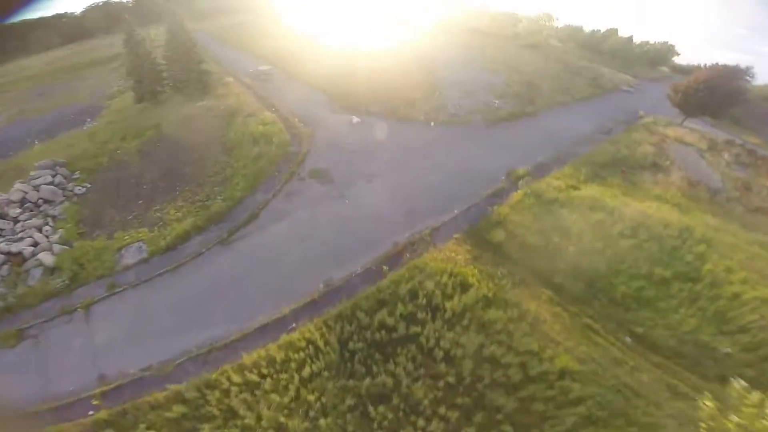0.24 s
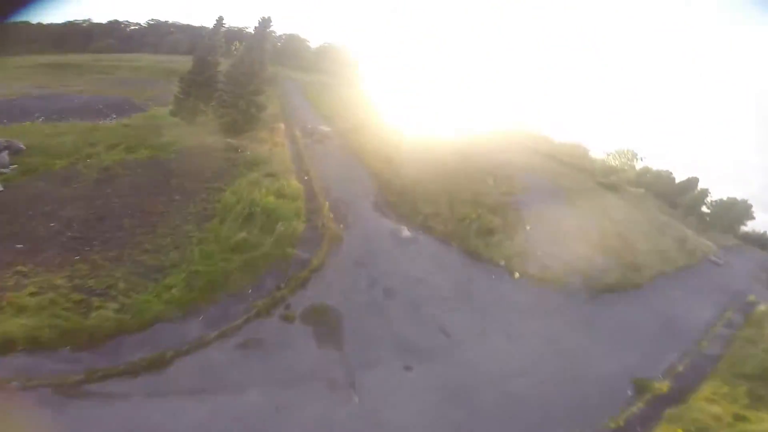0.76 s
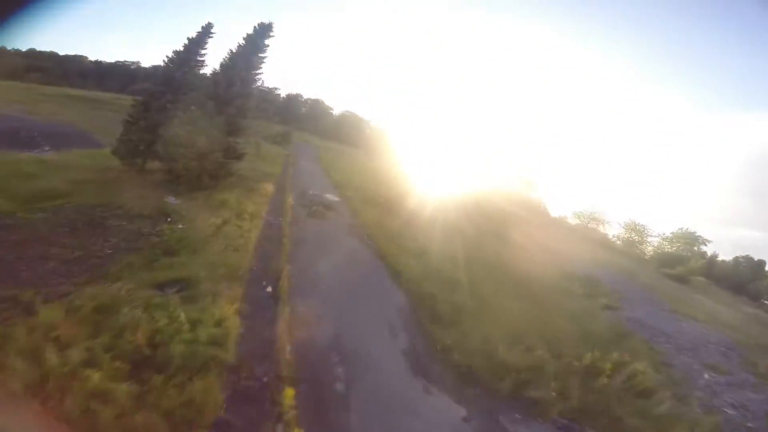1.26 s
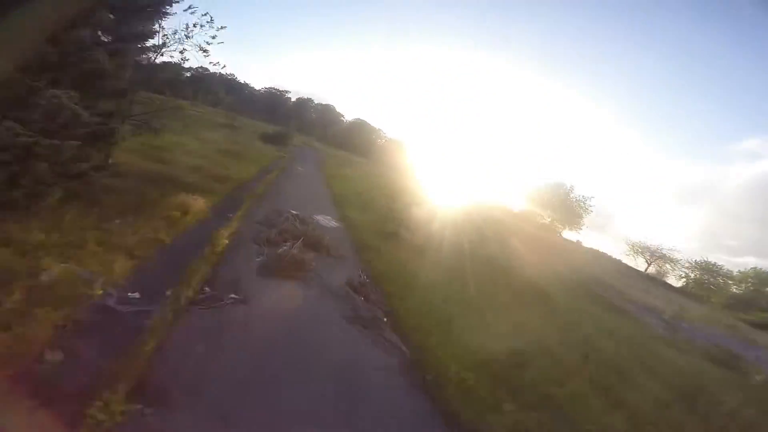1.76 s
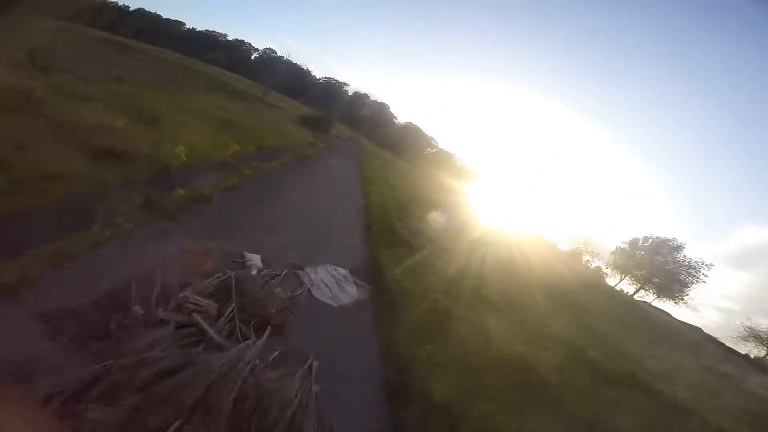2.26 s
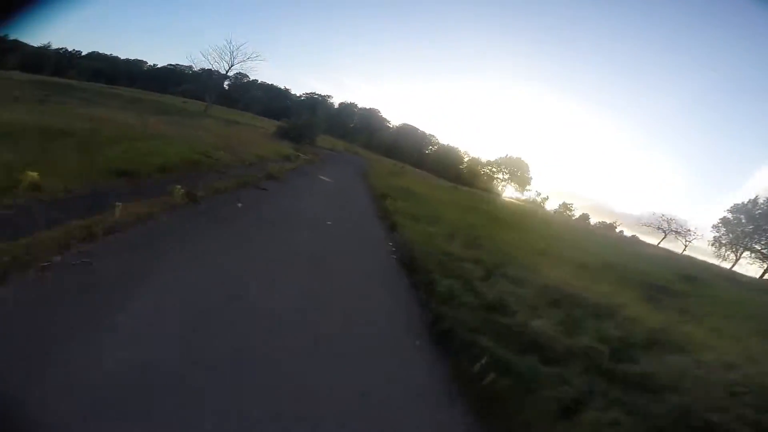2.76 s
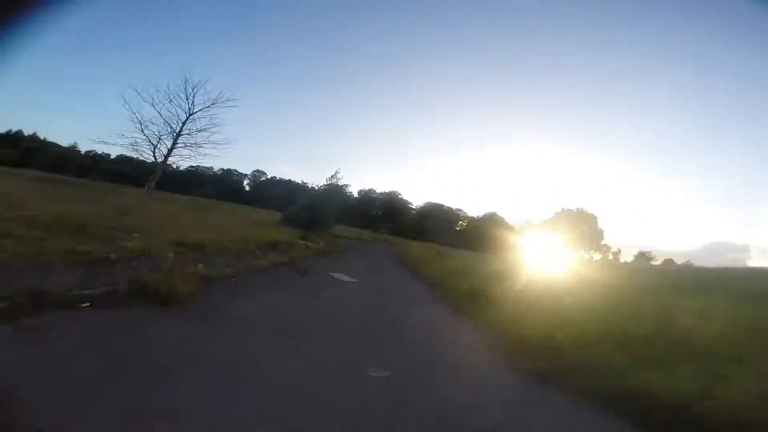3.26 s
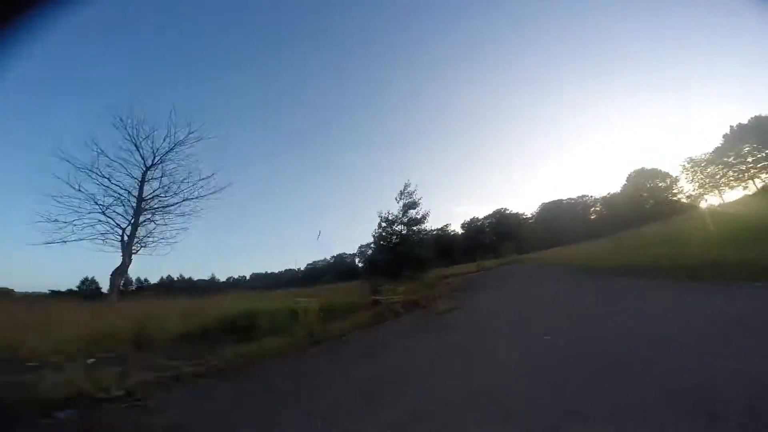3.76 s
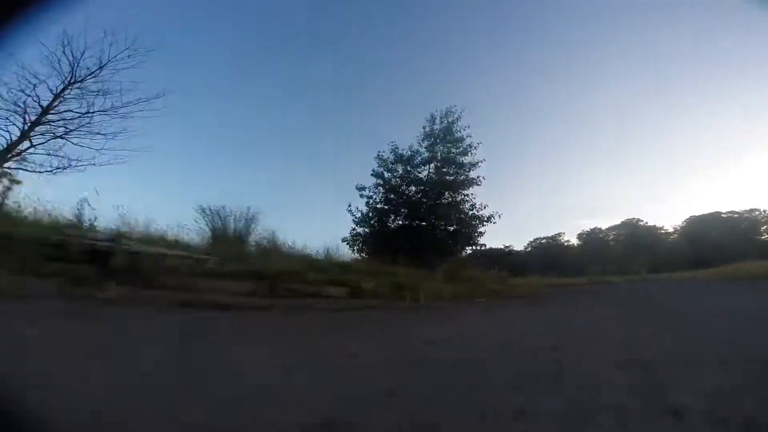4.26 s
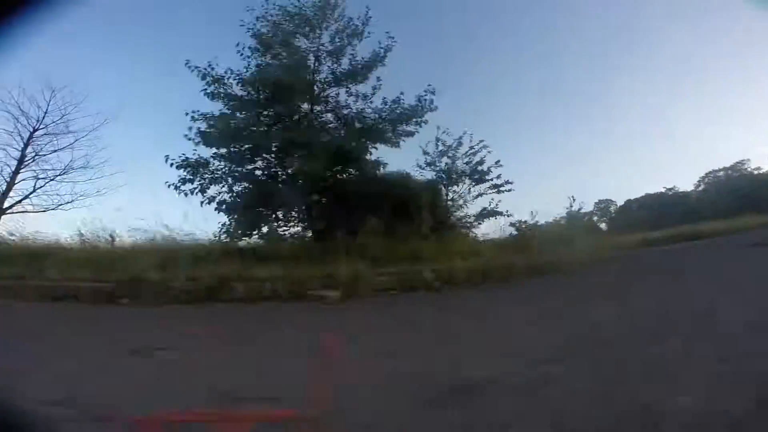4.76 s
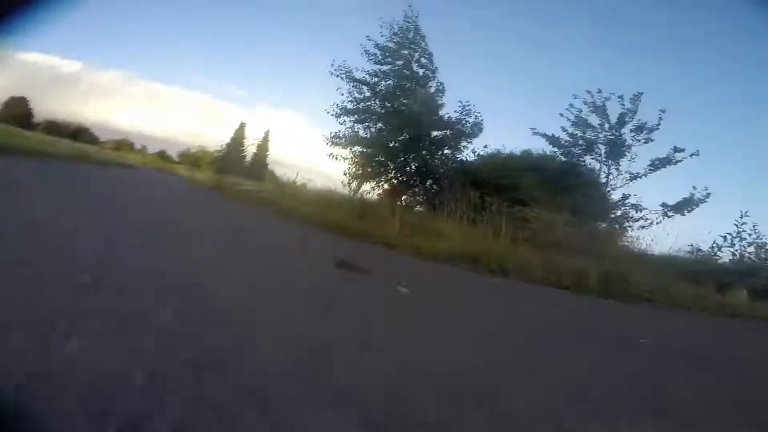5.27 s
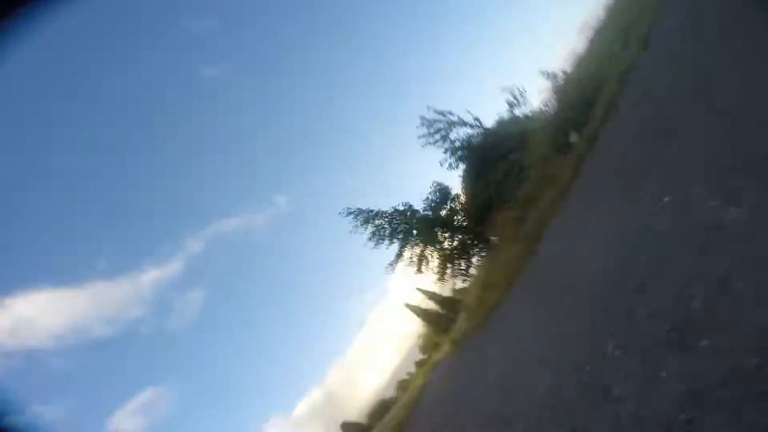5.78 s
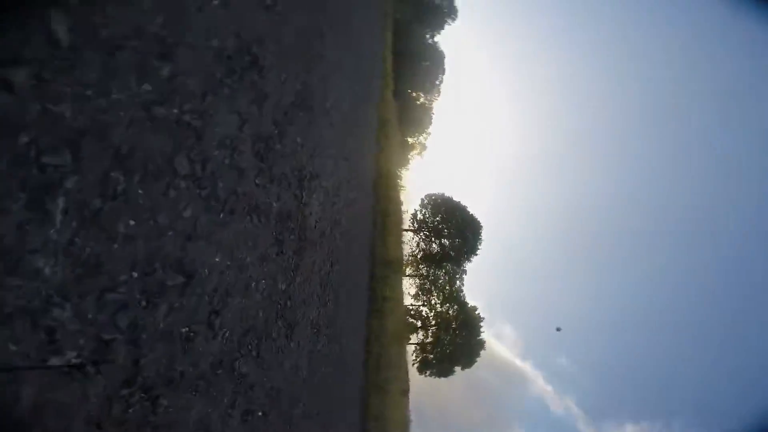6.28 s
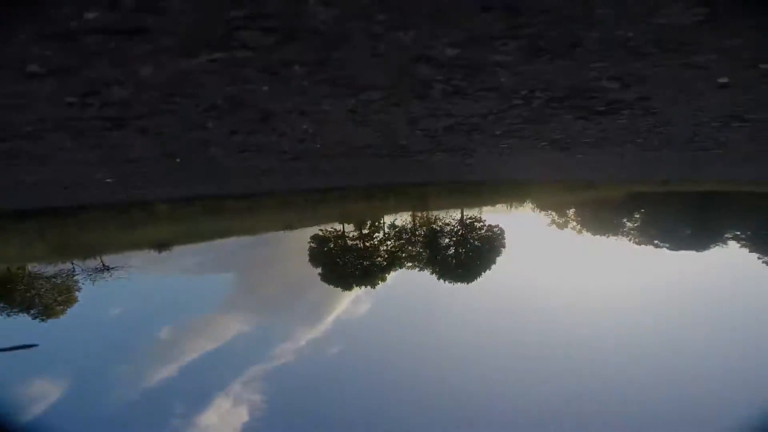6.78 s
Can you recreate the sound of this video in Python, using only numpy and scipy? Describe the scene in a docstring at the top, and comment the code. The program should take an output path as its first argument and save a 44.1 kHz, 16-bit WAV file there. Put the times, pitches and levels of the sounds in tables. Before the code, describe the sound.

Onboard a small quadcopter: wavering propeller drone, a sharp knock, rough sagging buzz, motor cut, then clattering thumps and scrapes before near silence outdoors.

```python
"""A racing quadcopter, heard from its own camera, swoops low over a path: four propeller tones beat in rushing air.
One propeller chips on the ground and from then on its imbalance shakes the frame once a turn.
The craft grazes the path again, its blows exciting damped frame modes; then the throttle is cut.
It tumbles over gritty asphalt, with thumps, noise bursts and stick-slip squeaks that overload the microphone,
and rocks to rest, leaving quiet outdoor air."""
import sys
import numpy as np
from scipy import signal
from scipy.fft import rfft, irfft, next_fast_len
from scipy.io import wavfile

SR = 44100
rng = np.random.default_rng(int(sys.argv[2]) if len(sys.argv) > 2 else 0)


def bounce(signal):
    """Save signal as a 16-bit WAV file at the path given by the first command-line argument."""
    frames = np.transpose(np.atleast_2d(signal))
    limited = np.clip(frames, -1, 1)
    pcm = np.round(limited * 32767).astype(np.int16)
    wavfile.write(sys.argv[1], SR, pcm)


N = 310047

# Levels in the tables are relative; the functions add the common offsets.
# Noise spectra, later scaled to rms 1: (frequency [Hz], density [dB per Hz])
STILL_AIR_SPECTRUM = [(25, 3.5), (150, -4), (700, -10.5), (1300, -27), (3000, -36.5), (8000, -34.5),
                      (15000, -41.5)]
WIND_SPECTRUM = [(20, -4.5), (45, 0.5), (85, 1.5), (160, 0), (260, -6), (500, -1.5), (1200, -53.5)]
BLADE_HISS_SPECTRUM = [(200, -2.5), (400, 2), (800, 10.5), (1100, -6), (1600, -4), (2300, -12.5),
                       (3800, -16), (4900, -13.5), (6800, -18), (8200, -24), (11000, -23), (13500, -37.5),
                       (14800, -29), (15600, -52.5)]
CHIPPED_HISS_SPECTRUM = [(150, -3.5), (300, 20), (600, 7.5), (1100, 2), (1700, -6.5), (2700, -10.5),
                         (3600, -12.5), (4500, -16.5), (6500, -18), (8500, -22), (11000, -20.5),
                         (13000, -31.5), (15000, -37), (15800, -56)]
GRIT_SPECTRUM = [(100, 9), (350, 9.5), (750, 13), (1000, -4), (1400, -2), (2200, -12.5), (3000, -4),
                 (4200, -17), (5800, -11), (7100, -16.5), (8500, -17), (11500, -18), (16000, -38.5)]
SLIDE_SPECTRUM = [(40, 10.5), (130, 12.5), (300, 12), (650, 1), (1100, -28), (2000, -33.5), (4000, -34),
                  (7000, -41), (11000, -45), (15000, -49)]
ROCKING_SPECTRUM = [(100, -35), (350, 4.5), (520, 11), (700, 0.5), (1000, -13.5), (2500, -38), (8000, -59),
                    (15000, -52)]

# Air in clean flight: (time [s], blade hiss [dB], buffeting [dB])
CLEAN_AIR = [(0, -40, -25), (.35, -38, -31), (1.15, -36.5, -31), (1.55, -34.5, -23), (1.85, -38, -25),
             (2.3, -36, -15), (2.66, -32.5, -15), (2.9, -38, -24.5), (3.2, -35, -22)]

# Stone squeaking along the frame: (time [s], level [dB])
SQUEAKS = [(4.3983, -34), (6.5043, -15.5), (6.5339, -25.5)]
SQUEAK_HZ, SQUEAK_WAVER = 6650, 0.11  # mean pitch, relative spread
SQUEAK_ATTACK_S, SQUEAK_RELEASE_S = 0.0014, 0.001

# Slides on the asphalt: (start time [s], length [s], level [dB])
SLIDES = [(4.401, .065, -24.5), (5.586, 0.011, -28), (5.676, 0.13, -35.5), (5.949, 0.011, -22),
          (6.035, 0.064, -21.5), (6.347, .06, -32), (6.384, 0.166, -28), (6.602, 0.034, -23),
          (6.774, 0.051, -31)]
SLIDE_ATTACK_S, SLIDE_RELEASE_S = 0.013, 0.038
# The frame rocks as it settles, building up to its last contact and dying away
ROCK_S, ROCK_DB, ROCK_RISE_S, ROCK_FALL_S = 6.955, -24, 0.11, 0.058

# Modes of frame and camera case: (frequency [Hz], level [dB], undamped-by-contact decay t60 [s])
FRAME_MODES = [(253, 3, 0.021), (332.5, 1, 0.022), (417.4, -2.5, 0.031), (556, 4, 0.029), (677, 3.5, 0.027),
               (774, 4.5, 0.036), (1350, -15.5, 0.017), (2050, -25, 0.0081), (2870, -23.5, 0.0084)]
# Bumps of the camera in its soft mount, without ground contact: (time [s], thump level [dB])
MOUNT_BUMPS = [(4.678, -16), (5.757, -8), (5.819, -1.5), (5.841, -8.5), (5.942, -3), (6.088, -13),
               (6.192, -7), (6.207, -11)]
BUMP_RING_DB, BUMP_HZ = -12.5, 220  # frame ring relative to the thump, frequency favoured
# Blows on the ground: (time [s], frame ring [dB], frequency favoured by the point of contact [Hz],
# thump [dB], grit [dB], grit decay t60 [s])
GROUND_BLOWS = [(3.208, 2.5, 326, -18, -19, 0.03), (4.398, -5, 500, -25, -14, 0.036),
                (4.410, -1.5, 238, -25, -26, 0.019), (4.431, -5, 251, -30, -42, .02),
                (4.958, -22, 496.3, -9.5, -10.5, 0.042), (4.970, 1, 325.7, -16, -27, .012),
                (5.6824, -1, 260.4, -0.5, -1, 0.014), (5.691, -14, 300, -16, -15, 0.011),
                (5.7353, -5.5, 450, -0.5, -10, 0.031), (5.8316, -14, 394, -8, -5, 0.005),
                (5.9323, -5, 603, -37, -9.5, 0.0095), (6.013, -11, 565, -31, -25, .028),
                (6.036, -12.5, 680, -18, -32, 0.045), (6.073, -13, 300, -15, -20, 0.031),
                (6.108, -13, 328, -25, -18, 0.038), (6.1724, -12, 645, -1.5, 3, 0.017),
                (6.178, 15.5, 201, 0.5, 5, 0.0062), (6.398, -6.5, 546, -14, -6.5, .022),
                (6.406, -6.5, 316, -8, -25, 0.048), (6.473, -23, 755, -36, -36, .024),
                (6.496, -16, 736, -28, -7, 0.026), (6.506, -6, 322, -14, -23, 0.021),
                (6.535, -15.5, 634, -12, -22.5, 0.014), (6.588, -20, 426, -22, -26, .03),
                (6.628, -20, 333, -21, -17.5, 0.021), (6.683, -21, 700, -26, 1.5, .016),
                (6.687, 7.5, 292.8, -8.5, 7, 0.0053), (6.842, 15, 392.4, -13, -7.5, 0.0088),
                (6.905, -1.5, 472, -36, -31, 0.028), (6.946, -11.5, 550, -46, -37, 0.04)]

# Frame resonances that lift any motor tone passing through: (frequency [Hz], width [Hz], lift [dB])
FRAME_LIFTS = [(1428, 140, 7), (1885, 52, 5.5), (2623, 78, 9), (2960, 180, 7)]
# Tone of a two-blade propeller: (multiple of the shaft rate, level [dB])
PROP_ORDERS = [(2, 1), (3, -28), (4, -24.5), (5, -31), (6, -31), (7, -34), (8, -35)]
# Swooping, easing off, pulling up: (time [s], blade-pass rate of each of the four propellers [Hz])
BLADE_PASS_RATES = [(0, 580.2, 702.4, 603, 435.2), (.13, 619.5, 687.2, 589.8, 462),
                    (0.279, 665, 667, 584, 518), (0.478, 716.7, 680.6, 608, 535),
                    (.8, 725.4, 695, 592, 542), (1.05, 740.6, 684, 593, 524), (1.35, 744, 672.3, 580, 504),
                    (1.561, 727, 648.4, 562, 460), (1.74, 696, 607.8, 542, 439.3),
                    (1.86, 642, 583.4, 522, 420), (2.04, 638, 546.6, 476, 397),
                    (2.319, 628, 536.4, 472, 381), (2.56, 627, 499.6, 470, 362.3),
                    (2.81, 629, 510.2, 476, 360), (2.99, 733.4, 608.6, 568, 417),
                    (3.21, 742, 635, 578, 442)]
# The four propellers: (tone at full thrust [dB], blade-pass rate below which it unloads [Hz])
PROP_LOADS = [(-19.5, 580), (-20.5, 370), (-20.5, 477), (-20, 519)]
THRUST_ORDER = 15  # how steeply the tone of an unloading propeller falls
INFLOW_DB, INFLOW_PER_S = 1.28, 4.7  # gusty inflow: spread and rate of each tone's swelling
# Hum of the shafts: (time [s], level relative to the blade tone, before the speed law [dB])
SHAFT_HUM = [(0, -9), (1.0, -12.5), (1.5, -6), (1.85, -7.5), (2.1, -13), (2.85, -12.5), (3.0, -4.5)]

CHIP_S, CUT_S = 3.213, 5.602  # the propeller chips; the throttle is cut
CRUISE_HZ = 300  # shaft rate at which the levels of the chipped propeller hold
# Chipped propeller at cruise: (time [s], shake [dB], blade tone [dB], hiss [dB], buffeting [dB])
CHIPPED_LEVELS = [(3.22, -14, -38, -44, -37), (3.68, -13, -32, -44.5, -43), (3.86, -11.5, -19.5, -39, -36),
                  (4.05, -10.5, -28, -43, -30.5), (4.35, -10.5, -26, -41.5, -42),
                  (4.58, -11, -21.5, -41.5, -63), (4.9, -11, -21, -36.5, -40), (5.05, -13.5, -26, -45, -40),
                  (5.3, -12.5, -19.5, -39, -21.5), (5.45, -12, -24, -36, -27),
                  (5.59, -7.5, -16, -32.5, -21)]
# Odd multiples, from the imbalance: (multiple of the shaft rate, level [dB])
SHAKE_ORDERS = [(3, -19.5), (5, -39), (7, -41.5), (9, -44), (11, -55), (13, -49)]
# Even multiples, from the blades: (multiple of the shaft rate, level [dB])
BLADE_ORDERS = [(2, 1), (4, -13), (6, -27.5), (8, -39), (10, -44.5), (12, -36.5)]
# Set speed on the chipped propeller: (time [s], shaft rate [Hz])
THROTTLE = [(3.21, 309), (3.7, 307.9), (4.0, 304.2), (4.35, 305.6), (4.6, 301.8), (5.1, 304.2), (5.4, 300),
            (5.6, 257)]
# The flight controller slows it briefly to steer or recover: (middle time [s], depth [Hz], length [s])
SPEED_DIPS = [(3.367, 14.6, 0.067), (3.556, 15, 0.038), (3.812, 35, 0.17), (3.912, 40.3, 0.096),
              (4.048, 12.2, .05), (4.448, 98, 0.11), (4.546, 22, 0.054), (4.654, 15.3, .07),
              (4.732, 14, 0.043), (4.841, 19.6, 0.058), (4.908, 33.5, 0.0484), (4.985, 36, 0.067),
              (5.19, 22, 0.061), (5.269, 14, .04), (5.376, 14.3, 0.046), (5.435, 19.2, 0.047)]
# The controller also hunts round the set speed: relative depth, mean rate, relative scatter of the rate
HUNT_SHARE, HUNT_PER_S, HUNT_SCATTER = 0.019, 21, 0.35
DIP_BUFFET_DB_PER_HZ = 0.154  # a slowed propeller lets the craft wobble in its own wash

TOP_HZ = 15800  # upper limit of the microphone's band


def undb(db):
    """Convert a level in decibels to an amplitude ratio."""
    return 10 ** (np.asarray(db) / 20)


def unit(x):
    """Normalise the mean power: scale to rms 1."""
    return x / np.sqrt(np.mean(x ** 2))


def clock():
    """Sampling instants in seconds."""
    return np.arange(N) / SR


def curves(rows):
    """Linear interpolation in time of each column of a table."""
    times, *columns = np.transpose(rows)
    return [np.interp(clock(), times, column) for column in columns]


def after(middle, fade):
    """Linear crossfade: a gate that opens around the given time."""
    return np.clip((clock() - middle) / fade + 0.5, 0, 1)


def swell(start, length, attack, release):
    """Exponential growth and decay: an envelope that reaches 1 at the start, holds and dies away."""
    time = clock()
    before = np.minimum(time - start, 0)
    beyond = np.maximum(time - start - length, 0)
    return np.exp(before / attack - beyond / release)


def walk(rate):
    """Low-pass filtered noise: a smooth random wander of rms 1 that is slower than the rate in Hz."""
    count = N // 10  # coarse samples suffice; the inverse transform interpolates them
    hz = np.arange(count // 2 + 1) * SR / N
    spectrum = rfft(rng.standard_normal(count)) / (1 + (hz / rate) ** 4)
    return unit(irfft(spectrum, next_fast_len(N))[:N])


def noise(points):
    """Spectral shaping of white noise, by straight lines in dB over log frequency; rms 1."""
    hz, db = np.transpose(points)
    bins = np.maximum(np.arange(N // 2 + 1) * SR / N, 1)
    gain = undb(np.interp(np.log(bins), np.log(hz), db))
    return unit(irfft(rfft(rng.standard_normal(N)) * gain, N))


def turning(hz):
    """Phase is the time integral of frequency, here from a random starting angle."""
    return 2 * np.pi * np.cumsum(hz) / SR + rng.uniform(0, 2 * np.pi)


def still_air():
    """Broadband ambient noise: the quiet outdoor air beneath everything."""
    return undb(-55.5) * noise(STILL_AIR_SPECTRUM)


def wind():
    """Turbulent pressure fluctuation: low-frequency noise whose level wanders with the gusts."""
    return undb(-6.5 + 2.3 * walk(6.8)) * noise(WIND_SPECTRUM)


def squeaks():
    """Stick-slip friction of stone on the frame: brief, high chirps of unsteady pitch."""
    contact = sum(undb(db) * swell(s, 0, SQUEAK_ATTACK_S, SQUEAK_RELEASE_S) for s, db in SQUEAKS)
    pitch_hz = SQUEAK_HZ * (1 + SQUEAK_WAVER * walk(700))
    return contact * np.sqrt(2) * np.sin(turning(pitch_hz))


def skid():
    """Sliding friction on rough asphalt: uneven scraping and flicked grains, then a rocking frame."""
    scrape = noise(SLIDE_SPECTRUM) * unit(undb(3.1 * walk(43) + 0.87 * walk(900)))
    grains = noise(GRIT_SPECTRUM) * unit(undb(8 * np.minimum(walk(260), 2.5)))
    rocking = noise(ROCKING_SPECTRUM) * unit(undb(5.3 * walk(55)))
    slides = [undb(db) * swell(s, length, SLIDE_ATTACK_S, SLIDE_RELEASE_S) for s, length, db in SLIDES]
    contact = np.max(slides, axis=0)
    settling = undb(ROCK_DB) * swell(ROCK_S, 0, ROCK_RISE_S, ROCK_FALL_S)
    return contact * (scrape + undb(-15.0) * grains) + settling * rocking


def strike_clock():
    """Time base of one impulse response, an eighth of a second long."""
    return np.arange(SR // 8) / SR


def frame_ring(favoured_hz, damping):
    """Modal superposition, peak 1: the point of contact decides which damped modes ring most."""
    t = strike_clock()
    ring = 0
    for index, (hz, db, t60) in enumerate(FRAME_MODES):
        octaves_off = np.log2(hz / favoured_hz)
        sign = (-1) ** index  # neighbouring modes swing in opposite senses
        share = sign * undb(db) / (1 + (octaves_off / 0.26) ** 2)
        decay = np.exp(-np.log(1000) * damping * t / t60)
        ring = ring + share * np.sin(2 * np.pi * hz * t) * decay
    return ring / abs(ring).max()


def case_thump():
    """Heavily damped oscillation of the camera case, high-passed, with a positive peak of 1."""
    t = strike_clock()
    dent = np.sin(2 * np.pi * 125 * t) * np.exp(-t / 0.002)
    thump = signal.sosfilt(signal.butter(1, 30, "high", fs=SR, output="sos"), dent)
    return thump / thump.max()


def mount_bumps():
    """Impulse excitation through the soft mount: the camera thumps and rings the frame a little."""
    out = np.zeros(N + SR)
    bump = case_thump() + undb(BUMP_RING_DB) * frame_ring(BUMP_HZ, damping=0.91)
    for s, db in MOUNT_BUMPS:
        i = int(s * SR)
        out[i:i + len(bump)] += undb(db) * bump
    return out[:N]


def ground_blows():
    """Impact excitation: each blow rings the frame, thumps the camera case and crunches grit."""
    out, t = np.zeros(N + SR), strike_clock()
    grit = noise(GRIT_SPECTRUM) * unit(undb(5.7 * walk(1200)))
    thump = case_thump()
    for s, ring_db, favoured_hz, thump_db, grit_db, grit_t60 in GROUND_BLOWS:
        i = int(s * SR)
        # a hard blow presses the frame to the ground, which chokes its ring
        choke = 1 + 0.5 * undb(ring_db) ** 1.24
        ring = undb(ring_db) * frame_ring(favoured_hz, choke)
        grit_envelope = np.exp(-np.log(1000) * t / grit_t60) * (1 - np.exp(-t / 0.00073))
        crunch = np.take(grit, i + np.arange(len(t)), mode="wrap") * grit_envelope
        out[i:i + len(t)] += ring + undb(thump_db) * thump + undb(grit_db + 4.5) * crunch
    return out[:N]


def overtones(angle, shaft_hz, orders, flicker_db):
    """Harmonic series of the shaft, lifted by frame resonance; turbulent inflow makes each one flicker."""
    out, speeds = 0, np.arange(100, 500)
    for k, db in orders:
        lift_db = sum(peak_db / (1 + (2 * (k * speeds - hz) / width) ** 2)
                      for hz, width, peak_db in FRAME_LIFTS)
        gain = undb(db + np.interp(shaft_hz, speeds, lift_db) + flicker_db * walk(36))
        out = out + np.sqrt(2) * gain * np.sin(k * angle + rng.uniform(0, 2 * np.pi))
    return out


def propellers(hiss_db):
    """Beating of four blade-pass tones; imbalance adds shaft hum, and passing blades shed puffs of hiss."""
    tone, puffs = 0, 0
    imbalance = undb(curves(SHAFT_HUM)[0])
    even = [(k, db) for k, db in PROP_ORDERS if k % 2 == 0]
    odd = [(k, db) for k, db in PROP_ORDERS if k % 2 == 1]
    for blade_hz, (db, unloaded_hz) in zip(curves(BLADE_PASS_RATES), PROP_LOADS):
        shaft_hz = blade_hz / 2  # two blades
        wander = 0.003 * walk(18) + 0.004 * walk(120)
        angle = turning(shaft_hz * (1 + wander))
        unloading = np.sqrt(1 + (unloaded_hz / blade_hz) ** (2 * THRUST_ORDER))
        thrust = undb(db + INFLOW_DB * walk(INFLOW_PER_S)) / unloading
        sway = np.sqrt(2) * np.sin(angle) + undb(9.5) * overtones(angle, shaft_hz, odd, flicker_db=1.0)
        hum = imbalance * (blade_hz / 700) ** 2 * sway  # the unbalanced force grows with speed squared
        tone = tone + thrust * (hum + overtones(angle, shaft_hz, even, flicker_db=1.04))
        puffs = puffs + np.cos(2 * angle)
    hiss = noise(BLADE_HISS_SPECTRUM) * unit(undb(1.5 * puffs + 0.5 * walk(23)))
    return tone + undb(hiss_db + 12.0) * hiss


def slowing():
    """Smooth cosine-squared dips in shaft rate, in Hz, by which the controller slows the chipped propeller."""
    dips = 0
    for middle, depth_hz, length in SPEED_DIPS:
        position = np.clip((clock() - middle) / length, -0.5, 0.5)
        dips = dips + depth_hz * np.cos(np.pi * position) ** 2
    return dips


def chipped_propeller(shake_db, blade_db, hiss_db, slowing_hz):
    """Rotating imbalance shakes the frame once a turn; power laws of speed make all parts sag when slowed."""
    hunting = np.sin(turning(HUNT_PER_S * (1 + HUNT_SCATTER * walk(9))))
    shaft_hz = (curves(THROTTLE)[0] - slowing_hz) * (1 + HUNT_SHARE * hunting)
    speed = shaft_hz / CRUISE_HZ
    angle = turning(shaft_hz * (1 + 0.00422 * walk(203)))
    hum = np.sqrt(2) * undb(0.5 * walk(42)) * np.sin(angle)
    sway = hum + overtones(angle, shaft_hz, SHAKE_ORDERS, flicker_db=2.5)
    shake = undb(shake_db) * speed ** 4.8 * sway
    blades = undb(blade_db) * speed ** 3 * overtones(angle, shaft_hz, BLADE_ORDERS, flicker_db=2.0)
    puffing_hiss = noise(CHIPPED_HISS_SPECTRUM) * unit(undb(2.3 * np.cos(angle) + 1.23 * walk(20)))
    hiss = undb(hiss_db + 15.5) * speed ** 3.9 * puffing_hiss
    return shake + blades + hiss


def scene():
    """Superposition in time: clean flight, shaking flight and crash, over quiet outdoor air."""
    air_hiss_db, buffet_db = curves(CLEAN_AIR)
    shake_db, blade_db, chipped_hiss_db, wash_db = curves(CHIPPED_LEVELS)
    chipped, cut = after(CHIP_S, 0.0022), after(CUT_S, 0.022)
    gusts, slowing_hz = wind(), slowing()
    clean = propellers(air_hiss_db) + undb(buffet_db) * gusts
    wash = undb(wash_db + DIP_BUFFET_DB_PER_HZ * slowing_hz) * gusts
    shaking = chipped_propeller(shake_db, blade_db, chipped_hiss_db, slowing_hz) + wash
    flight = (1 - chipped) * clean + chipped * shaking
    crash = skid() + squeaks() + ground_blows() + mount_bumps()
    return ((1 - cut) * flight + crash + still_air())[None]


def record(dry):
    """Overload and band limiting: the camera clips the hardest blows, then a steep low-pass cuts the top."""
    overloaded = np.clip(dry, -1, 1)
    low_pass = signal.ellip(8, 0.2, 70, TOP_HZ, fs=SR, output="sos")
    return signal.sosfilt(low_pass, overloaded)


dry = scene()
out = record(dry)
bounce(out)
```